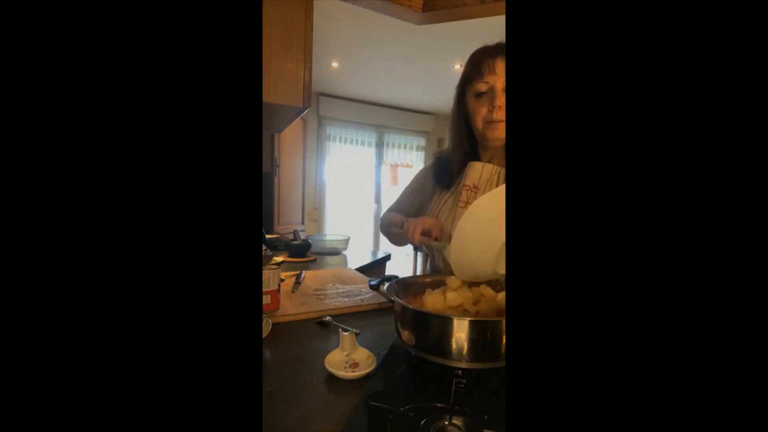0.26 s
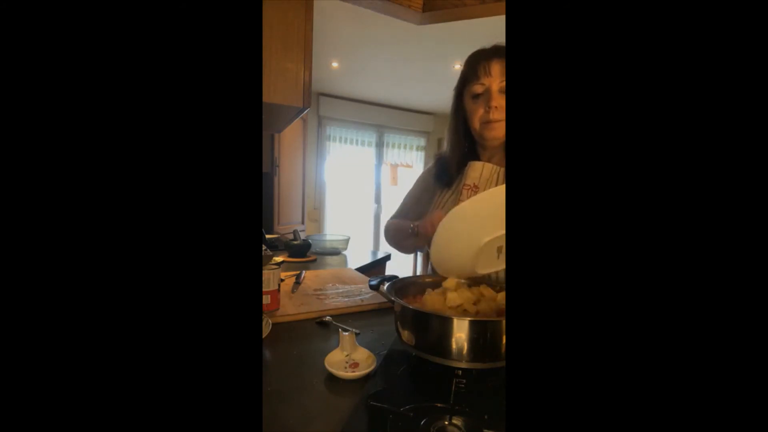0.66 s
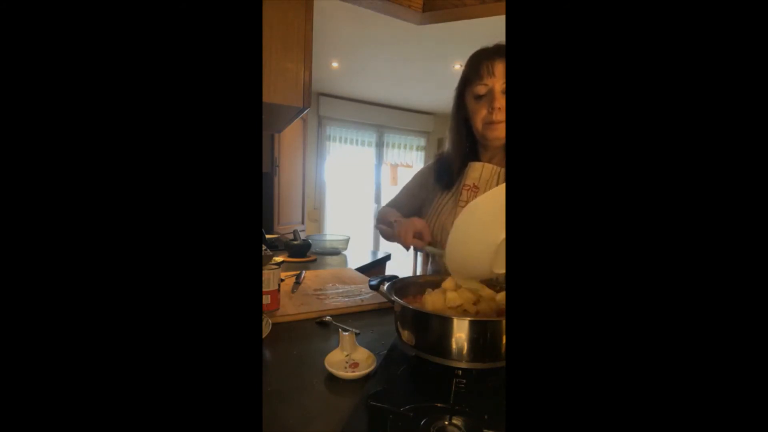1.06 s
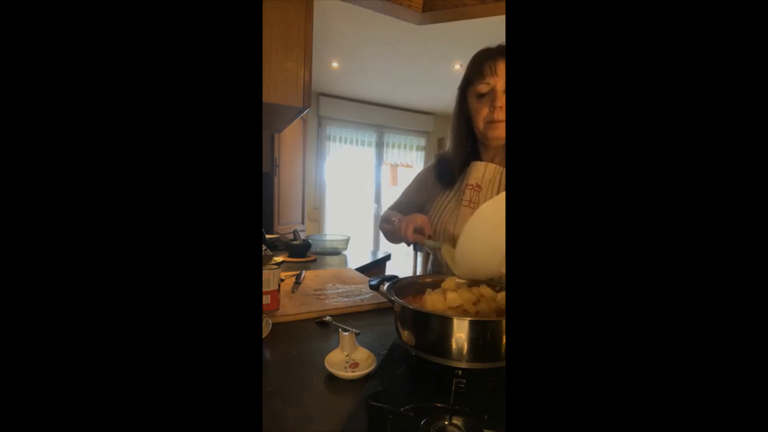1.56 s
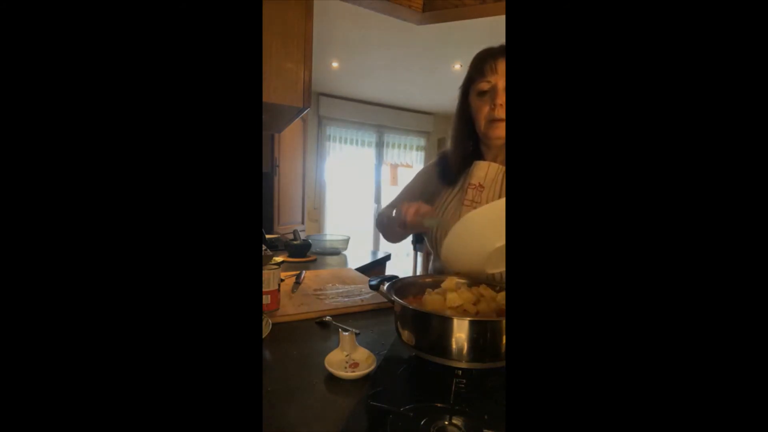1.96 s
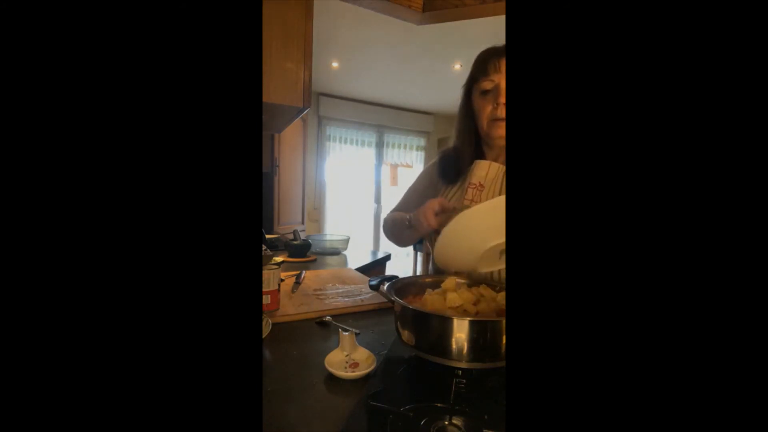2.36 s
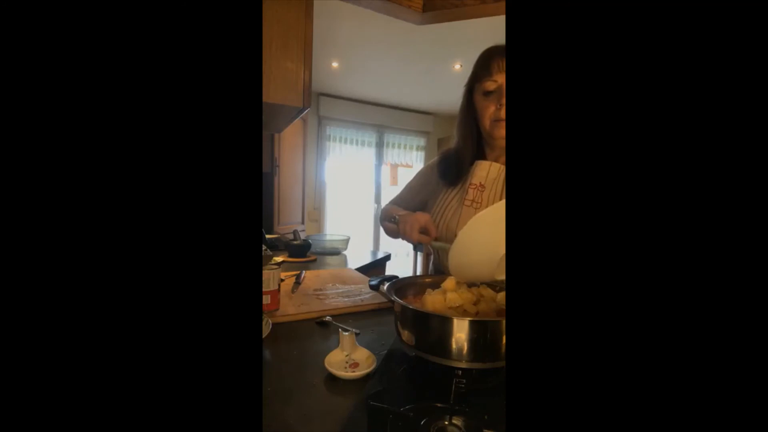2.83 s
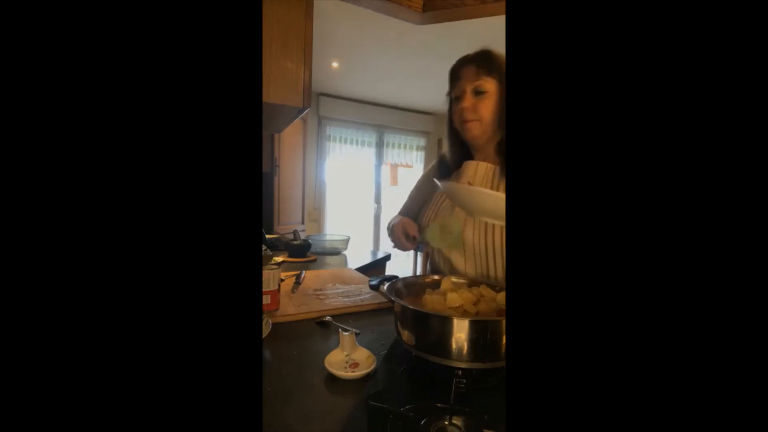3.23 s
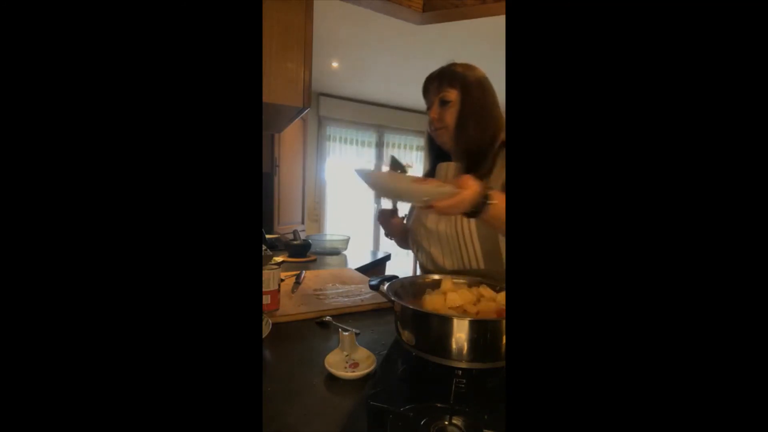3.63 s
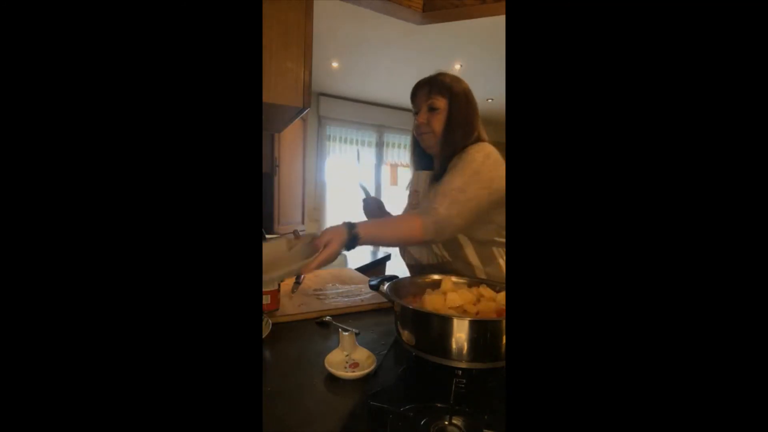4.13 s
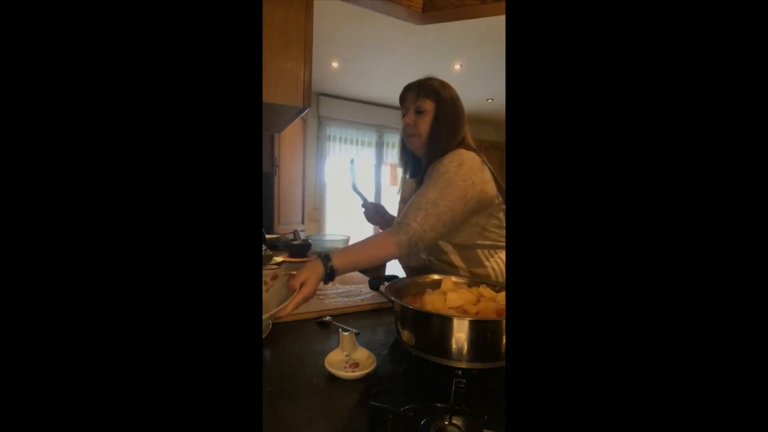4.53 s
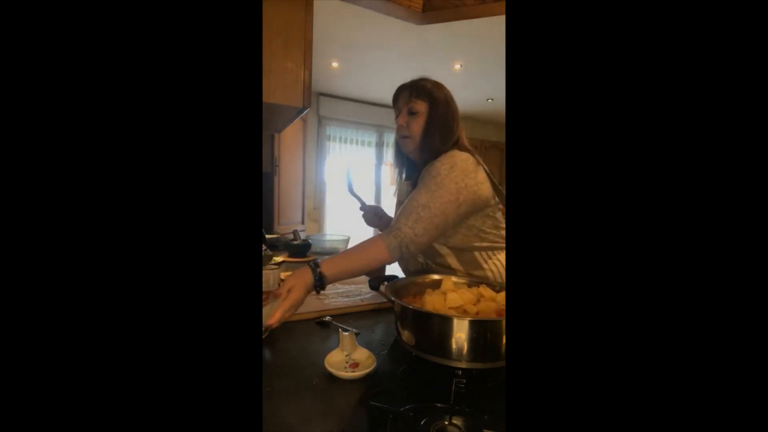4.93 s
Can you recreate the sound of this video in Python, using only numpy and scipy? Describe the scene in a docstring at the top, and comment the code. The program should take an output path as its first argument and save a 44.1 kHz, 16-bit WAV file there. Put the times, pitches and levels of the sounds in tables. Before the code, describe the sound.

A small hard kitchen heard through one stationary microphone channel. A low hob hum, a faint higher pan tone and dull room air run throughout. From 0 s fruit and juice simmer very quietly, with fine uneven bubbling, light fizz and occasional small pops that rise in pitch. A tiny squeak of utensil on glaze comes at 0.7 s, a barely audible very high one near 1.9 s, and a cluster of short wavering squeaks at 2.4-2.55 s. Soft wet smacks fall around 1.6-1.7, 2.0, 2.3 and 2.7 s, then at 4.0, 4.4 and 4.6 s. At about 3.75 s a dull, low rustle swells quickly and fades as the bowl is carried. At 4.66 s the china bowl and utensil hit other dishes: a very loud, sharp clatter of rapid contacts, renewed at 4.85, 4.91, 5.0 and 5.09 s, with hollow knocks, bright short ringing and lively room echo.

```python
"""In a small hard kitchen, fruit and juice are scraped from a china bowl into a steel pan simmering on a humming hob.
Small bubbles pop as rising sines, wet pieces smack as noise bursts, and the utensil squeaks as wavering whistles.
Then the bowl is put down among other dishes and clatters loudly, with the utensil: decaying modes ring under
bursts of noise. Echoes place these sounds in the room; one microphone channel also holds narrow-band hum from
the hob with a higher steady tone of the pan, air and handling."""
import sys
import numpy as np
from scipy import signal
from scipy.fft import rfft, irfft
from scipy.io import wavfile
from scipy.ndimage import uniform_filter1d

SR = 44100
rng = np.random.default_rng(int(sys.argv[2]) if len(sys.argv) > 2 else 0)


def to_wav(s):
    """Save 16-bit WAV."""
    ch = np.atleast_2d(s).T  # columns
    pcm = np.round(np.clip(ch, -1, 1) * 32767)  # PCM
    wavfile.write(sys.argv[1], SR, pcm.astype(np.int16))


N = 229099

# The bowl lands and rocks in quick runs of contacts. Each row: start in seconds, number of contacts,
# gap in seconds, loss per contact in dB (negative grows), relative bowl ring in dB, crack in dB, knock in dB,
# knock pitch in Hz, counter thud in dB, first treble tilt in dB per octave.
LANDINGS = [(4.6572, 3, 0.018, 6, -23.5, -14.5, -22.5, 1082, -27, -3),
            (4.851, 3, 0.013, 5, -34.5, -9.5, -7.5, 1178, -21, -2),
            (4.9105, 3, 0.01, 1.5, -33, -19.5, -24.5, 1158, -28.5, -2.5),
            (5.0028, 2, .0138, -1.5, -21.5, -16, -38, 1073, -28, -0.24),
            (5.0873, 6, 0.015, 0.98, -25, -12, -15, 925, -25, -2)]
# The bowl's strongest modes. Each row: pitch in Hz, relative level in dB, 60 dB decay time in seconds.
BOWL_MODES = [(486, -16, .28), (635, -12, .24), (1095, -12, .18), (1196, -10, .15), (1599, -12, .14),
              (1770, -10, .2), (1978, 0, .38), (2239, -13, .25), (2450, -7, .15), (2934, -5, .38),
              (3250, -7, .22), (3639, -10, .13), (4042, -2, .25), (4231, -5, .15), (5138, -10, .19),
              (5310, -10, .24), (5357, -4, .26), (5868, -6, .17), (6492, -8, .16), (6660, -11, .15),
              (6960, -10, .19), (8323, -13, .14), (8565, -12, .16), (9216, -13, .14), (9523, -12, .16),
              (12618, -17, .13), (13442, -15, .14)]
# Modes of the dishes underneath. Each row: multiple of the knock pitch, relative level in dB,
# 60 dB decay time in seconds.
DISH_MODES = [(0.511, -16, 0.31), (0.55, -16, 0.13), (.86, -10.5, 0.072), (0.929, -7.5, 0.26), (1, 1, .11),
              (1.091, -8, 0.16), (1.369, -9, 0.021)]
# Spectrum of the hard crack of crockery and utensil. Each row: frequency in Hz, relative density in dB per Hz.
CRACK_SPECTRUM = [(300, -36), (500, 2.5), (720, -3.5), (1100, 12), (1450, 1), (2200, 0), (3300, 3.5),
                  (4300, 4.5), (4800, 0.5), (6900, 1), (7600, -5.5), (8800, -5), (11000, -9), (15500, -11)]
# Spectrum of dull weight on the counter. Each row: frequency in Hz, relative density in dB per Hz.
THUD_SPECTRUM = [(50, -19), (90, -11), (150, -2), (210, -2.5), (270, -7.5), (600, -14.5), (2000, -61)]
# Spectrum of wet fruit. Each row: frequency in Hz, relative density in dB per Hz.
WET_SPECTRUM = [(300, -16), (1200, -22), (2500, 1.5), (5500, -6), (9000, -13.5), (15000, -48)]
# Spectrum of the air in the kitchen. Each row: frequency in Hz, relative density in dB per Hz.
AIR_SPECTRUM = [(15, -32), (25, -7.5), (76, -1), (149, -15.5), (439, -15.5), (575, -22.5), (659, -32),
                (754, -18), (1290, -17.5), (2110, -19), (2760, -26.5), (6050, -31), (10400, -44.5),
                (13600, -38.5), (16000, -49)]
# The largest bubbles popping in the fruit. Each row: start in seconds, relative level in dB, starting pitch in Hz.
LARGE_BUBBLES = [(0.076, -34.5, 1680), (0.149, -44.5, 1530), (0.5264, -41, 1670), (1.2962, -38.5, 1730),
                 (1.378, -39.5, 1930), (2.0454, -36.5, 1610), (2.194, -41, 1720), (2.3062, -34.5, 1530),
                 (2.659, -35.5, 1590), (2.832, -39.5, 1730), (3.556, -36, 1620), (4.0433, -34.5, 2120),
                 (4.2087, -37.5, 2110), (4.402, -38, 2150)]
# The loudest wet smacks of fruit and juice. Each row: start in seconds, level before decay in dB.
WET_SMACKS = [(1.591, -51), (1.698, -52), (1.996, -56.5), (2.337, -55), (2.7, -51), (4.007, -54.5),
              (4.045, -47.5), (4.433, -53.5), (4.639, -46.5)]
# The utensil squeaking on the glaze. Each row: start in seconds, length in seconds, mean pitch in Hz,
# level in dB, level of the octave relative to the whistle in dB.
GLAZE_SQUEAKS = [(0.69, 0.021, 5630, -53, -16), (1.86, .05, 14800, -63, -30),
                 (2.435, 0.054, 8700, -55.5, -30), (2.448, 0.031, 6440, -50.5, -9),
                 (2.475, 0.027, 6900, -54.5, -2), (2.495, 0.046, 4860, -48, -18),
                 (2.51, 0.027, 9400, -52.5, -30)]
# Low hum of the hob, and in the last row the higher steady tone of the pan resonating as it simmers.
# Each row: centre in Hz, half-width at half amplitude in Hz, level in dB.
HOB_AND_PAN_TONES = [(60.8, 9.1, -56.5), (80, 7.1, -59), (221.5, 20, -70), (436, 12, -73.5),
                     (653.4, 16.6, -64), (1282, 22, -65.5)]

TIME = np.arange(N) / SR   # seconds
CUTOFF_HZ = 16000
ROOM_T60_S, ROOM_TREBLE_T60_S = 0.67, 0.44
CONTACT_JITTER = 0.05      # share of the gap
REBOUND_TILT_DB = -0.22    # change of tilt on each rebound, dB per octave
SIMMER_DB, FIZZ_DB = -61, -68   # before the flutter
# The bowl is swung across the counter: the rumble swells to its peak and dies away.
CARRY_PEAK_S, CARRY_DB, CARRY_RISE_DB_PER_S, CARRY_FALL_DB_PER_S = 3.757, -56.5, 110, 20


def contacts():
    """Each landing rebounds at a nearly even pace, duller every time and in most runs weaker."""
    # Each row: start in seconds, ring, crack in dB, tilt in dB per octave, knock in dB, pitch in Hz, thud in dB.
    rows = []
    for start_s, count, gap_s, loss_db, ring_db, crack_db, knock_db, knock_hz, thud_db, first_tilt_db in LANDINGS:
        for k in range(int(round(count))):
            jitter = CONTACT_JITTER * rng.standard_normal() * (k > 0)
            s = start_s + gap_s * (k + jitter)
            lost_db = k * loss_db
            tilt_db = first_tilt_db + k * REBOUND_TILT_DB
            rows.append((s, ring_db - lost_db, crack_db - lost_db, tilt_db,
                         knock_db - lost_db, knock_hz, thud_db - lost_db))
    return rows


def cracks(hits, chatter_db, chatter_t60, rattle_db, shimmer_db, count=90):
    """Each blow chatters as uneven noise and wakes the many weak modes of the crockery and utensil."""
    out, size = np.zeros(N), SR // 3
    places = (np.arange(count) + rng.random(count)) / count
    hz = 1400 + (CUTOFF_HZ - 1400) * places ** 1.4   # modes crowd towards the low end
    mode_t60 = 0.12 * (hz / np.median(hz)) ** -0.2   # seconds; higher modes die sooner
    modes = struck(hz, mode_t60, size)
    for s, _, crack_db, tilt_db, *_ in hits:
        strengths = colour(CRACK_SPECTRUM, hz, tilt_db) * rng.standard_normal(count)
        shimmer = from_db(shimmer_db) * strengths / np.linalg.norm(strengths) @ modes
        unsteady = rms_one(uniform_filter1d(rng.standard_normal(size), size=90))
        bounces = rms_one(from_db(rattle_db * unsteady))
        rattling = noise(CRACK_SPECTRUM, size, tilt_db) * bounces
        chatter = from_db(chatter_db) * rattling * fade(chatter_t60, size)
        add(out, s, from_db(crack_db) * (shimmer + chatter) * swell(0.00027, size))
    return out


def knocks(hits, thud_t60, rise_s, scatter):
    """The weight of the bowl knocks hollowly on the dishes underneath and thuds into the counter."""
    out, size = np.zeros(N), SR // 3
    ratio, mode_db, t60 = np.transpose(DISH_MODES)
    # the knock keeps nothing below about 420 Hz
    knock_low_cut = signal.butter(2, 420, "high", fs=SR, output="sos")
    for s, *_, knock_db, knock_hz, thud_db in hits:
        # the dishes shift as they are pressed
        shift = 1 + scatter * rng.uniform(-0.93, 1, len(ratio))
        modes = struck(knock_hz * ratio * shift, t60, size)
        knock = from_db(knock_db + mode_db) @ modes * swell(rise_s, size)
        thud = from_db(thud_db) * noise(THUD_SPECTRUM, size) * fade(thud_t60, size) * swell(0.0098, size)
        add(out, s, signal.sosfilt(knock_low_cut, knock) + thud)
    return out


def bowl(hits, uneven_db, split, treble_db):
    """Blows on different spots excite each mode differently; an out-of-round bowl has beating twin modes."""
    out, size = np.zeros(N), SR // 2
    hz, mode_db, t60 = np.transpose(BOWL_MODES)
    twins = hz * (1 + split * rng.uniform(-1.24, 1, len(hz)))
    modes = struck(hz, t60, size) + 0.5 * struck(twins, t60, size)
    modes = modes * swell(0.00033, size)
    octaves = np.log2(hz / np.median(hz))
    for s, ring_db, _, tilt_db, *_ in hits:
        brightness_db = (tilt_db + treble_db) * octaves
        spot_db = uneven_db * rng.standard_normal(len(hz))
        strengths = from_db(ring_db + mode_db + brightness_db + spot_db)
        add(out, s, strengths * rng.choice([-1, 1], len(hz)) @ modes)
    return out


def squeaks(waver):
    """Stick and slip on the glaze: a swelling, unsteady whistle with its octave."""
    out = np.zeros(N)
    unsteady = rms_one(uniform_filter1d(rng.standard_normal(N), size=60))
    for s, length, hz, db, octave_db in GLAZE_SQUEAKS:
        at, size = int(s * SR), int(length * SR)
        pitch = hz * (1 + waver * unsteady[at:at + size])
        phase = 2 * np.pi * np.cumsum(pitch) / SR
        # no octave where it would pass half the sample rate
        octave = from_db(octave_db) * np.sin(2 * phase) * (4 * hz < SR)
        add(out, s, from_db(db) * np.hanning(size) * (np.sin(phase) + octave))
    return out


def smacks(t60):
    """Wet pieces part and land, each with a short burst of decaying noise."""
    out, size = np.zeros(N), SR // 8
    for s, db in WET_SMACKS:
        add(out, s, from_db(db) * noise(WET_SPECTRUM, size) * fade(t60, size))
    return out


def pops(t60, rise_s, glide):
    """A bursting bubble rings briefly, rising in pitch as it opens."""
    out, size = np.zeros(N), SR // 25
    t = TIME[:size]
    for s, db, hz in LARGE_BUBBLES:
        tone = np.sin(2 * np.pi * hz * t * (1 + glide * t))
        add(out, s, from_db(db) * tone * swell(rise_s, size) * fade(t60, size))
    return out


def grains(per_s, centre_hz, octaves, cycles, spread_db, count=14):
    """Many tiny bubbles ring at random times, at pitches spread about a centre; unit rms."""
    out = np.zeros(N)
    for place in np.linspace(-1, 1, count):
        hz = min(centre_hz * 2 ** (place * octaves), 0.4 * SR)
        sizes = from_db(spread_db * np.minimum(rng.exponential(1, N), 3.5))
        sizes = sizes * rng.choice([-1, 1], N)
        bursts = rng.random(N) < per_s / count / SR
        out += np.exp(-place ** 2) * ring(sizes * bursts, hz, cycles / hz)
    return rms_one(out)


def pan(flutter_depth_db, flutter_hz):
    """Juice bubbles and fizzes with a modest, uneven flutter in level, under the louder pops and smacks."""
    flutter_db = flutter_depth_db * murmur(0, flutter_hz)
    bubbles = grains(per_s=320, centre_hz=1604, octaves=0.67, cycles=15.2, spread_db=6.0)
    tiny_bubbles = grains(per_s=1000, centre_hz=4120, octaves=1.32, cycles=13, spread_db=1.5)
    simmer = from_db(SIMMER_DB + flutter_db) * bubbles
    fizz = from_db(FIZZ_DB + flutter_db) * tiny_bubbles
    large = from_db(4.0) * pops(t60=0.014, rise_s=0.00027, glide=5.5)
    return simmer + fizz + large + smacks(t60=0.055)


def handling():
    """A dull rustle of arm and apron as the bowl is carried: low noise swells fast and dies away slower."""
    since = TIME - CARRY_PEAK_S
    swing_db = np.minimum(CARRY_RISE_DB_PER_S * since, -CARRY_FALL_DB_PER_S * since)
    return from_db(CARRY_DB + swing_db) * noise(THUD_SPECTRUM, N)


def hob_and_pan_tones():
    """Low hum of the hob, with a higher steady tone of the pan resonating as it simmers: narrow bands of noise."""
    return sum(from_db(db) * murmur(hz, width_hz) for hz, width_hz, db in HOB_AND_PAN_TONES)


def kitchen_air():
    """The steady air of the room is mostly low-pitched noise."""
    return from_db(-56) * noise(AIR_SPECTRUM, N)


def kitchen(x, near_db, tail_db):
    """Scattered echoes off counter and cupboards, then a diffuse tail whose treble dies first."""
    size = SR // 2
    late = TIME[:size] > 0.003   # no echo before 3 ms
    sparse = rng.random(size) < 1500 / SR   # about 1500 near echoes per second
    near = rng.standard_normal(size) * sparse * fade(0.012, size) * late
    white = rng.standard_normal(size)
    low = signal.sosfilt(signal.butter(1, 4000, fs=SR, output="sos"), white)
    treble = white - low
    tail = (low * fade(ROOM_T60_S, size) + treble * fade(ROOM_TREBLE_T60_S, size)) * late
    near_echoes = from_db(near_db) * near / np.linalg.norm(near)
    diffuse = from_db(tail_db) * tail / np.linalg.norm(tail)
    return x + signal.fftconvolve(x, near_echoes + diffuse)[:N]


def from_db(db):
    """Decibels to gain."""
    return 10 ** (np.asarray(db) / 20)


def rms_one(x):
    """Scale to unit rms."""
    return x / np.sqrt(np.mean(x ** 2) + 1e-20)


def add(out, s, sound):
    """Mix a sound in at a time in seconds."""
    at = int(np.clip(round(s * SR), 0, N - 1))
    out[at:at + len(sound)] += sound[:N - at]


def fade(t60, size):
    """Exponential decay from 1, losing 60 dB in t60 seconds."""
    return from_db(-60 * TIME[:size] / t60)


def swell(rise_s, size):
    """Exponential build-up towards 1, with its time constant in seconds."""
    return 1 - np.exp(-TIME[:size] / rise_s)


def colour(spectrum, hz, tilt_db):
    """Gain of a spectrum, tilted in dB per octave about 3 kHz."""
    points, levels = np.transpose(spectrum)
    level_db = np.interp(np.log(hz), np.log(points), levels)
    return from_db(level_db + tilt_db * np.log2(hz / 3000))


def noise(spectrum, size, tilt_db=0):
    """Unit-rms noise with a spectrum."""
    hz = np.maximum(np.fft.rfftfreq(size, 1 / SR), 1)
    white = rfft(rng.standard_normal(size))
    return rms_one(irfft(white * colour(spectrum, hz, tilt_db), size))


def murmur(hz, width_hz):
    """Unit-rms noise in one narrow resonance."""
    f = np.fft.rfftfreq(N, 1 / SR)
    white = rfft(rng.standard_normal(N))
    return rms_one(irfft(white / (1 + ((f - hz) / width_hz) ** 2), N))


def struck(hz, t60, size):
    """One decaying sine for each mode."""
    t = TIME[:size]
    return np.array([np.sin(2 * np.pi * f * t) * fade(decay_s, size) for f, decay_s in zip(hz, t60)])


def ring(drive, hz, t60):
    """A two-pole resonator: a unit click sets a decaying sine of starting height 1 ringing."""
    r, w = from_db(-60 / (t60 * SR)), 2 * np.pi * hz / SR
    return signal.lfilter([0, np.sin(w)], [1, -2 * r * np.cos(w), r * r], drive + 1e-18)


def scene():
    """Bowl, utensil and pan sound with the room's echoes, over handling, steady tones and air."""
    hits = contacts()
    blows = knocks(hits, thud_t60=0.16, rise_s=0.00074, scatter=0.021)
    blows = blows + cracks(hits, chatter_db=-1.5, chatter_t60=0.14, rattle_db=0.5, shimmer_db=-6.0)
    ringing = from_db(-2.0) * bowl(hits, uneven_db=1.5, split=0.0066, treble_db=1.7)
    clatter = kitchen(blows, near_db=-10.5, tail_db=-11) + kitchen(ringing, near_db=-9.5, tail_db=-11.0)
    scraping = kitchen(squeaks(waver=0.027), near_db=0.5, tail_db=-3.5)
    cooking = kitchen(pan(flutter_depth_db=3.5, flutter_hz=29), near_db=-6.0, tail_db=-10)
    return (clatter + scraping + cooking + handling() + hob_and_pan_tones() + kitchen_air())[None]


def record(dry):
    """At the microphone channel the loudest peaks are rounded, then the deepest bass and the top are cut."""
    top = 0.8   # ceiling of the rounding
    rounded = top * np.tanh(dry / top)
    bass_cut = signal.butter(4, 40, "high", fs=SR, output="sos")
    top_cut = signal.cheby2(18, 80, CUTOFF_HZ + 700, fs=SR, output="sos")
    return signal.sosfilt(top_cut, signal.sosfilt(bass_cut, rounded))


dry = scene()
out = record(dry)
to_wav(out)
```